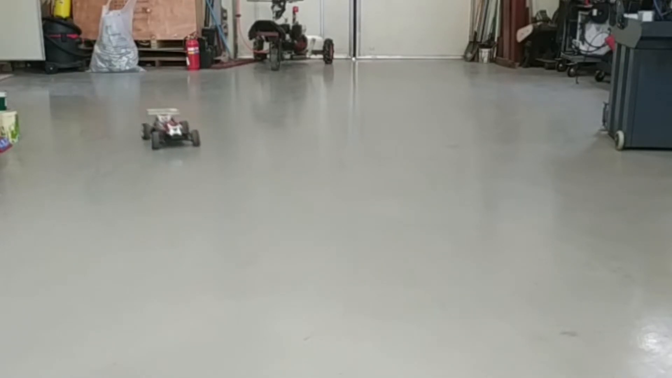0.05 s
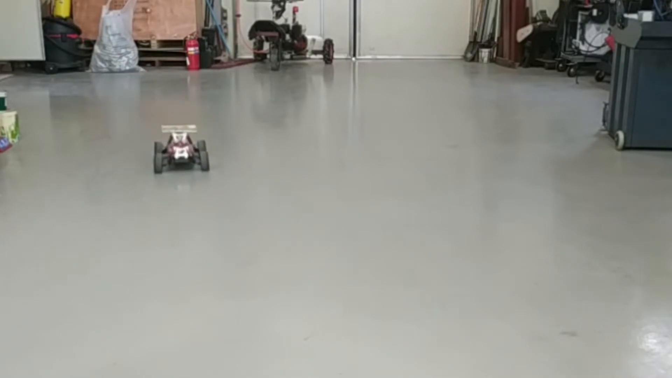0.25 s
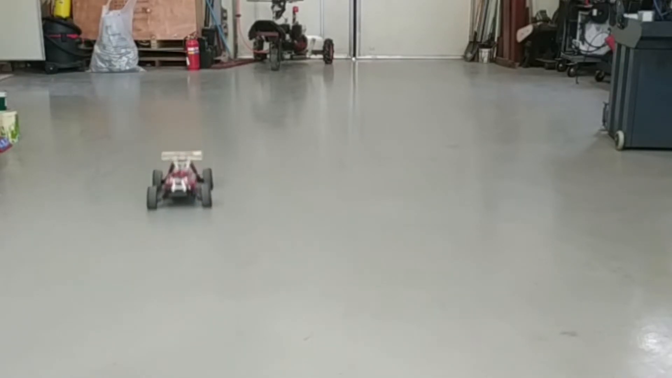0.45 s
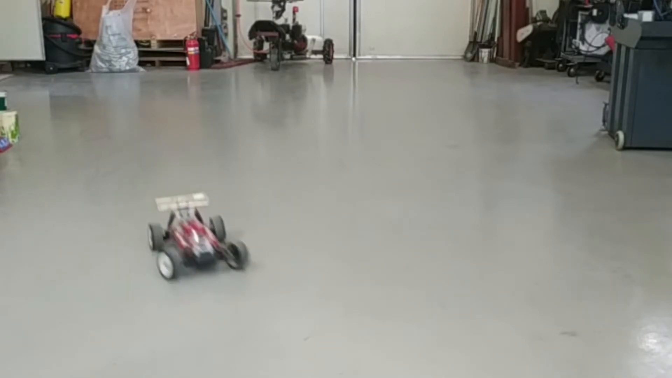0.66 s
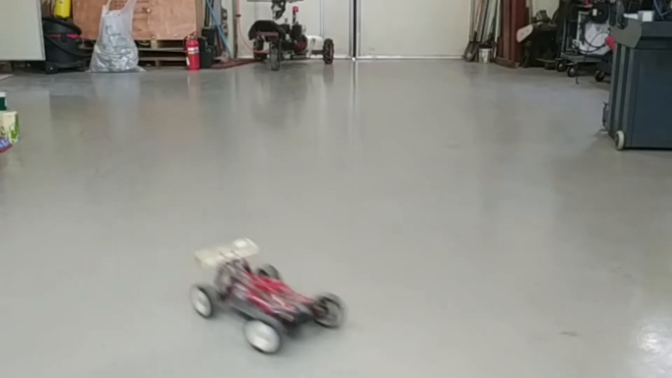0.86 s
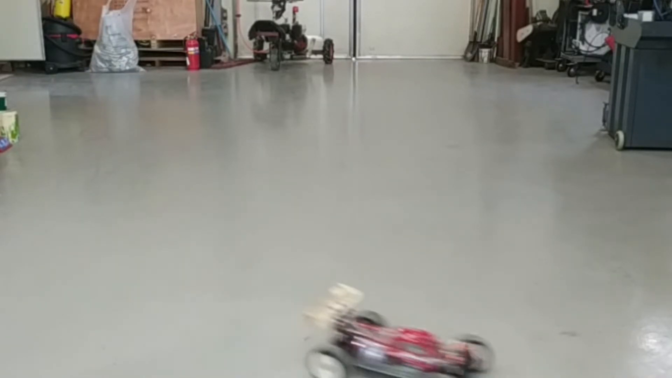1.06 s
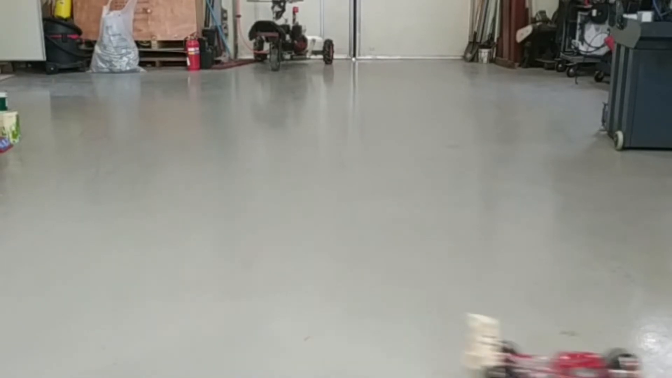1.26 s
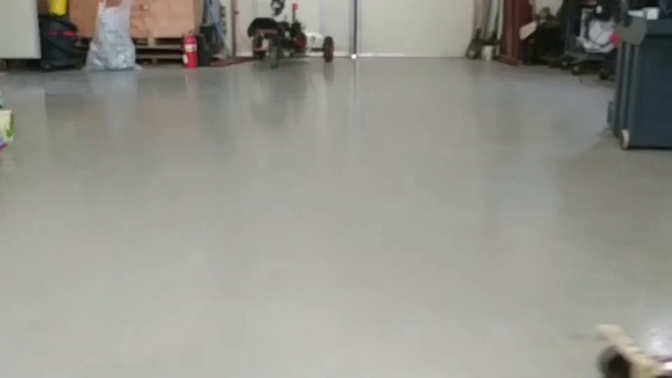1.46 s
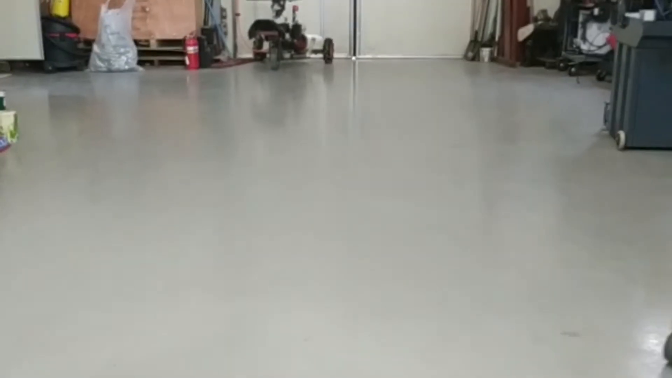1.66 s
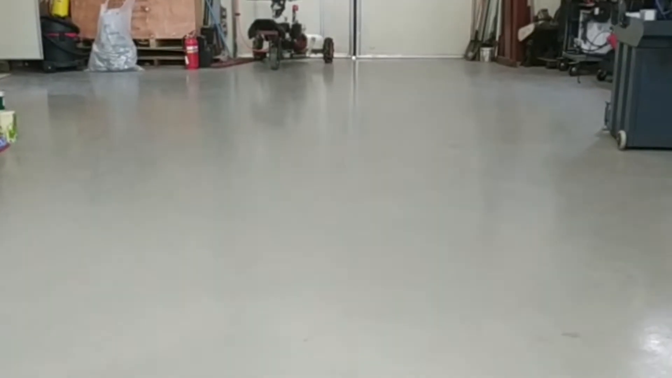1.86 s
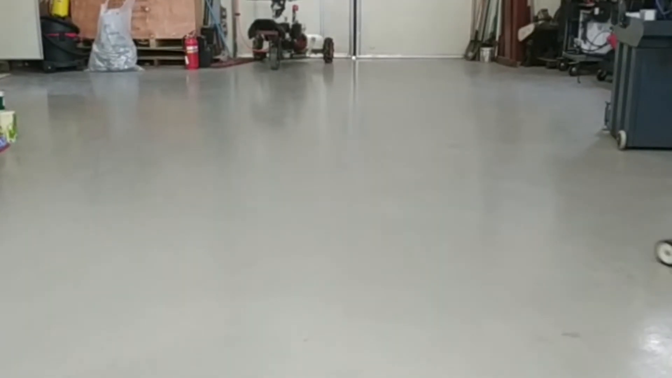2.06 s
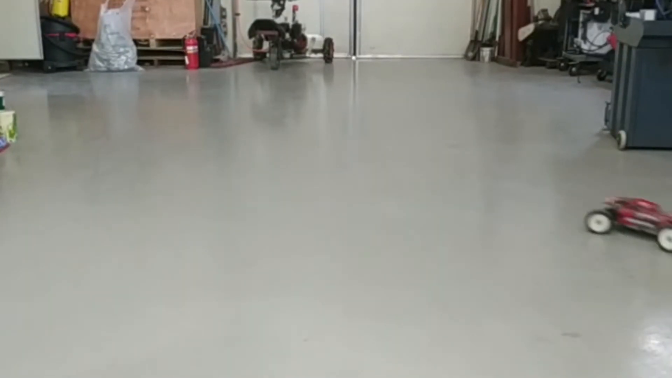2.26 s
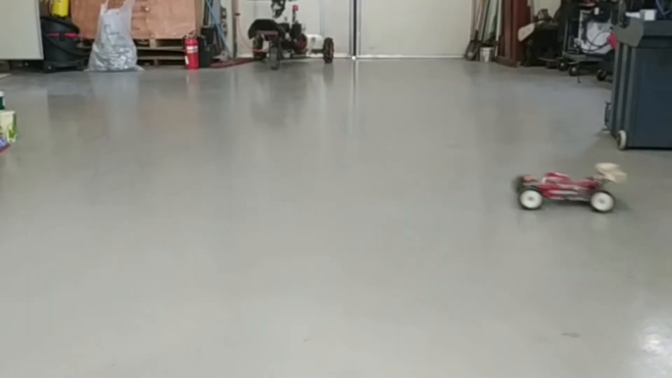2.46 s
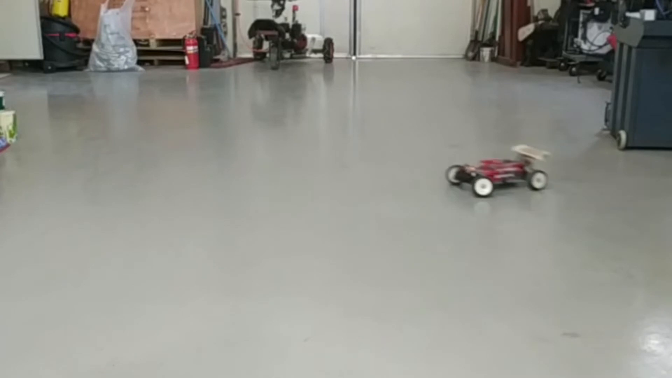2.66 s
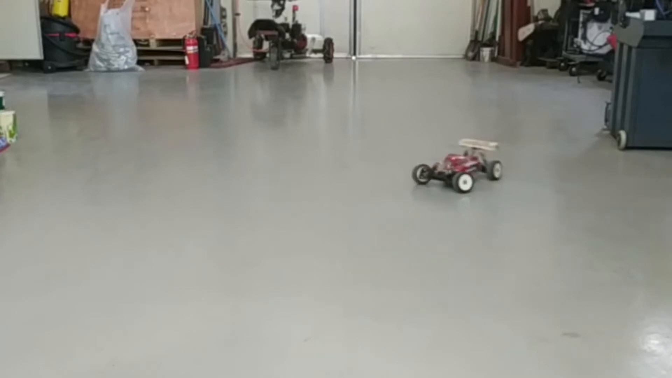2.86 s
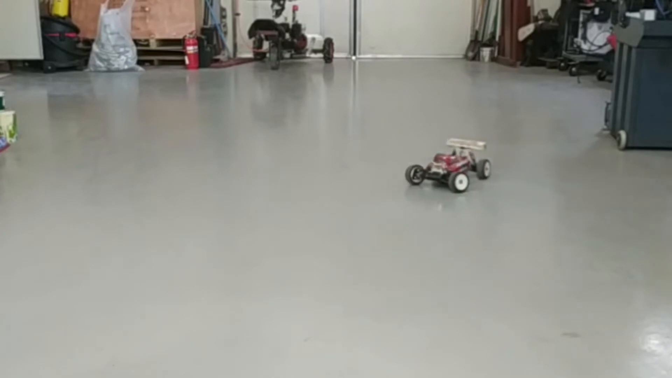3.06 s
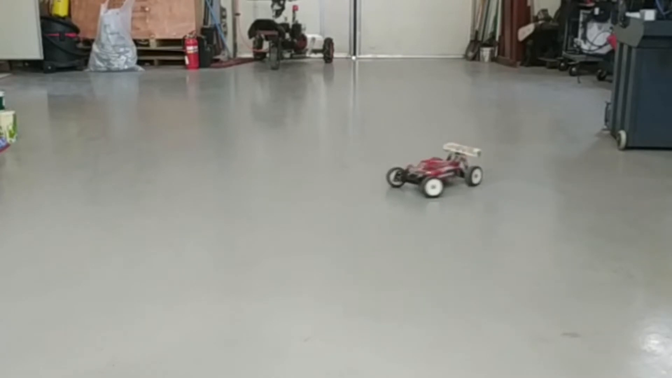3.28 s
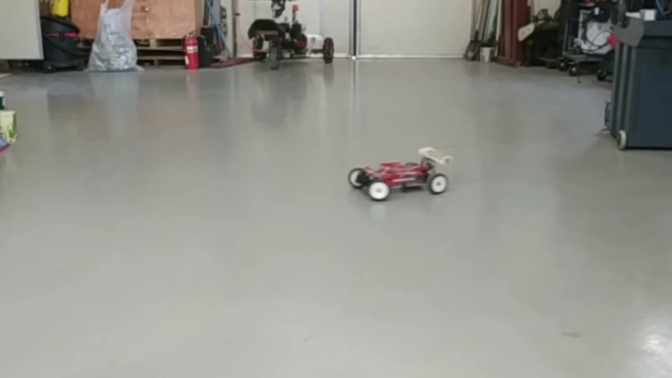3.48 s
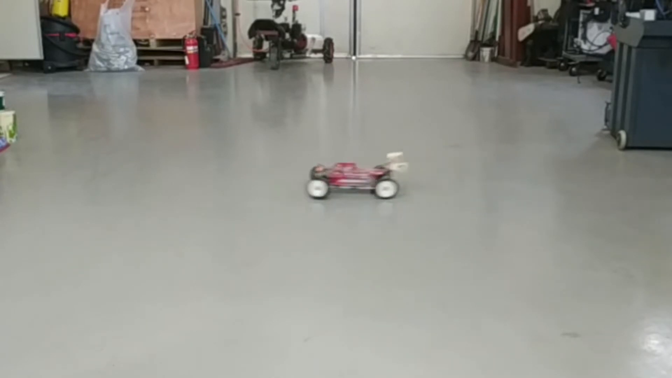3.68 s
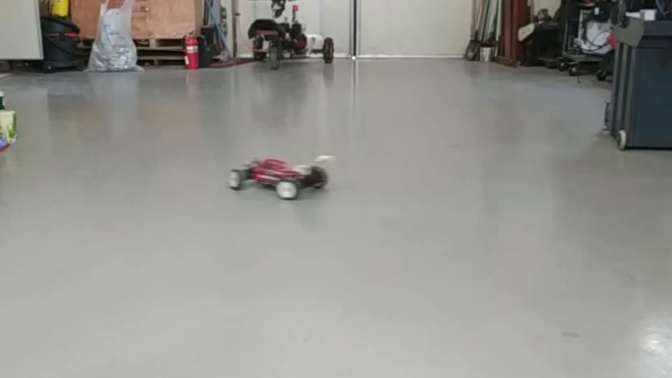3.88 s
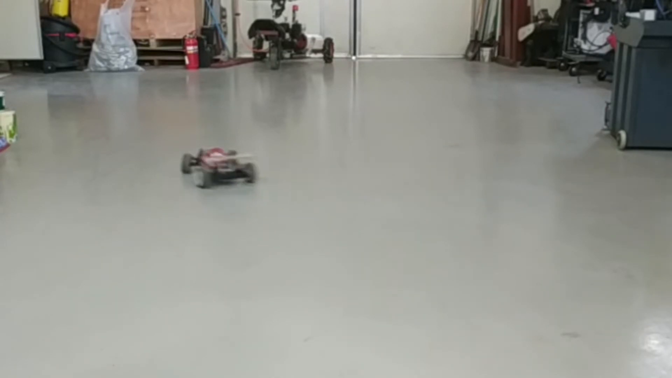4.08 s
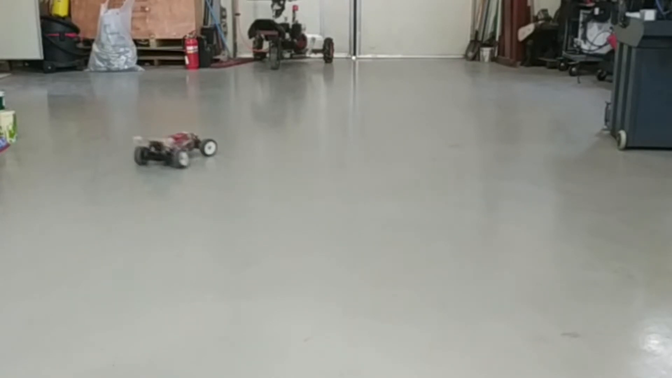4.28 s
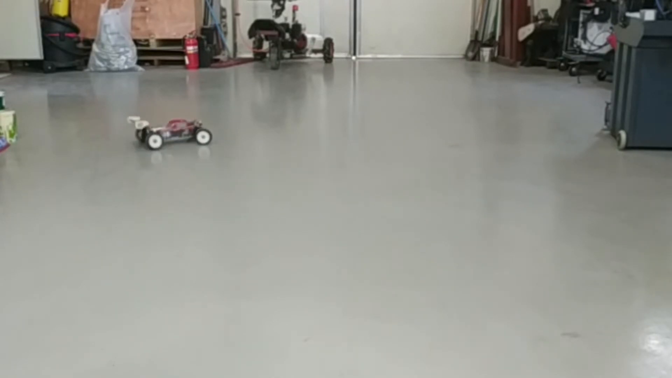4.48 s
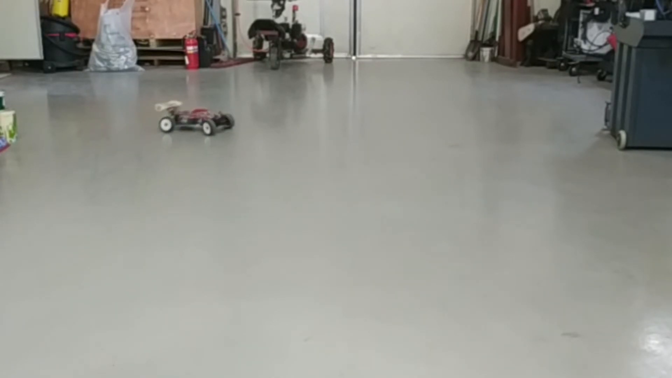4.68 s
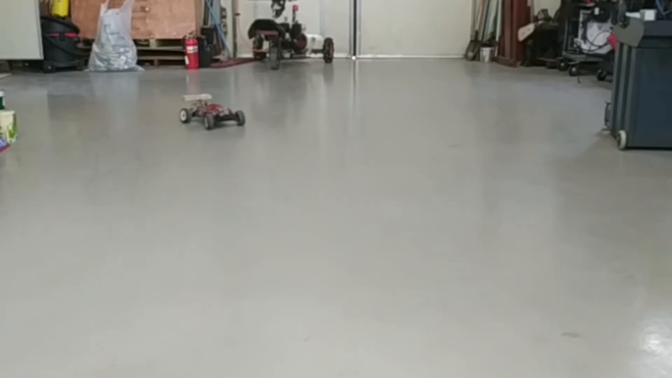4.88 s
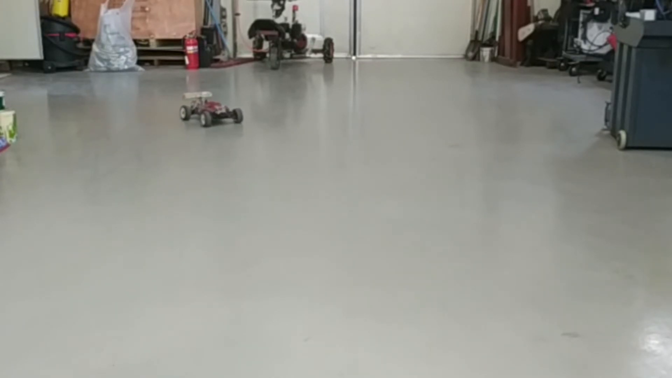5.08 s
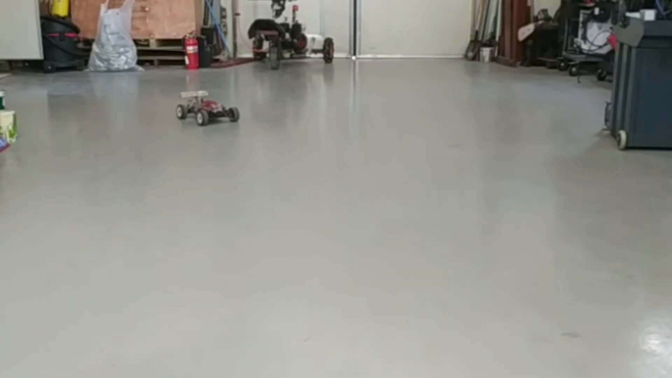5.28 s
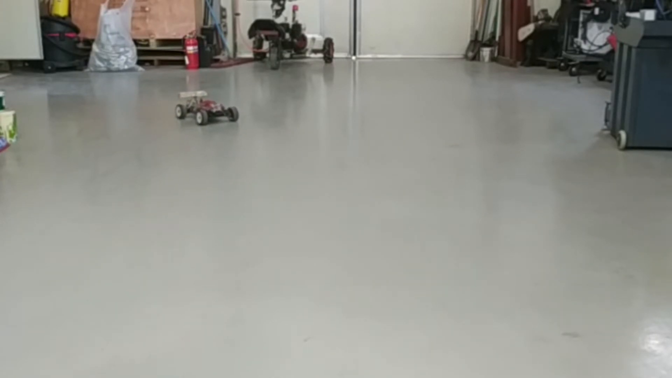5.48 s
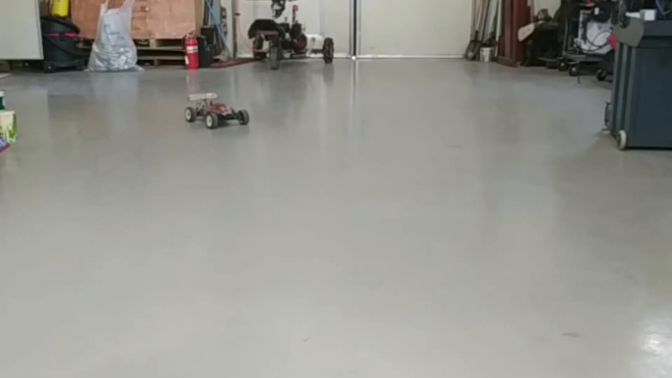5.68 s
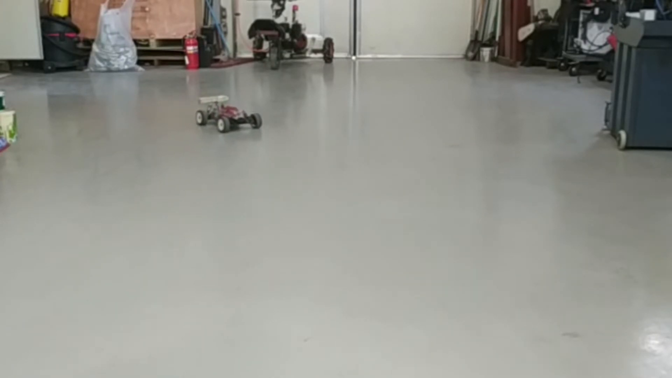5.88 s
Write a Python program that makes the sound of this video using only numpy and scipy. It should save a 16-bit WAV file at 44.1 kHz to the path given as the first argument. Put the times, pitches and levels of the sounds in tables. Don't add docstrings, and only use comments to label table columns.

```python
import sys
import numpy as np
from scipy import signal
from scipy.fft import rfft, irfft, next_fast_len
from scipy.io import wavfile
from scipy.ndimage import uniform_filter1d

SR = 44100
rng = np.random.default_rng(int(sys.argv[2]) if len(sys.argv) > 2 else 0)


def magnitude_from_level(level_db):
    exponent = np.asarray(level_db, float) / 20
    return 10 ** exponent


def transcribe(signal):
    frames = np.atleast_2d(signal).T
    limited = np.clip(frames, -1, 1)
    pcm = np.round(limited * 32767).astype(np.int16)
    wavfile.write(sys.argv[1], SR, pcm)


N = 261821
TIME = np.arange(N) / SR
FAST = next_fast_len(N)

# (frequency [Hz], density [dB per Hz])
HALL_AIR = [(15, -65), (25, -42), (92, -22), (217, -1.5), (293, -7), (775, -14), (1290, -2), (1440, -32),
            (3340, -24), (3620, -49), (5880, -27), (12900, -22), (16000, -30)]
# (frequency [Hz], time to fall 60 dB [s])
ECHO_T60 = [(200, 0.64), (1500, 1.39), (5000, 0.69), (13000, 0.1)]
# (frequency [Hz], likeness [0-1])
LIKENESS = [(30, 0.1), (70, .8), (130, 1), (290, 0.81), (640, 0.51), (1410, 0.03), (3100, 0.05),
            (15000, 0.01)]
# (time [s], distance [m])
DISTANCE = [(0, 4.4), (.8, 2.46), (1.5, 1.44), (2.3, 2.3), (3.0, 1.93), (5.94, 4.6)]
# (time [s], level [dB])
ROLLING = [(0, -32.5), (.24, -38.5), (.6, -36), (.87, -37.5), (1.25, -41.5), (1.55, -44), (1.95, -49),
           (2.3, -34), (2.5, -38.5), (2.93, -57.5), (3.04, -95.5), (3.25, -36), (3.42, -46), (3.52, -43.5),
           (3.77, -36), (4.67, -36), (5.19, -68.5), (5.43, -66.5), (5.64, -39.5), (5.87, -73)]
# (start [s], rise [s], hold [s], level [dB], release [dB per s])
PULLS = [
    (0.237, 0.013, 0.093, -33.5, 72),
    (1.6, 0.03, 0.03, -38, 90),
    (1.622, 0.074, 0.083, -30.5, 94),
    (1.931, 0.032, 0.11, -32, 63),
    (3.047, 0.055, 0.063, -30.5, 91),
    (3.534, 0.032, 0.006, -27, 66),
    (3.893, 0.055, 0.072, -34, 38),
    (4.23, 0.076, 0.043, -32, 46.5),
    (5.44, 0.06, 0.066, -32.5, 86),
    (5.875, .035, 0.045, -37, 95.5),
]
JOLT = [.18, .18, .1, .18, 0.29, .3, .18, .18, 0.067, .1]
PULL_EDGE_DB = [-0.5, 4, 3, 1, -0.5, -1.5, 0.5, 0.5, 2, 2]
# (start [s], spin-up [s], tooth rate from [Hz], to [Hz], whine over the frame rattle [dB])
SPINS = [(-.01, .25, 2650, 2400, -2), (4.37, .02, 1800, 2500, -14), (5.26, .05, 451, 455, 26),
         (5.36, .08, 475, 548, 20), (.66, .2, 2600, 2450, -10), (.95, .65, 1400, 720, -10),
         (3.595, .06, 1290, 3750, -1), (4.0, .1, 1400, 4750, -6), (.225, .03, 1500, 1700, -12),
         (.257, .075, 1700, 2650, 5), (.345, .005, 2720, 2760, 4), (1.64, .04, 830, 760, 6),
         (1.725, .04, 800, 1050, 6), (1.96, .045, 1030, 1120, 11), (2.0, .055, 1080, 1560, 11),
         (2.04, .07, 1480, 3450, 7), (2.115, .04, 3500, 4600, -2), (3.045, .055, 600, 940, 7),
         (3.095, .04, 900, 1850, 8), (3.135, .018, 1840, 1860, 7), (3.153, .01, 2100, 2350, 0),
         (3.245, .045, 2200, 1200, -6), (3.31, .07, 1210, 1180, -1), (3.53, .045, 850, 1280, 8),
         (3.925, .03, 1000, 1290, 5), (4.15, .08, 1150, 1270, -2), (4.24, .12, 1580, 1750, -7),
         (5.445, .075, 550, 1100, 8), (5.512, .015, 1090, 1138, 11), (5.89, .03, 650, 810, 7)]
# (rolling [dB], slope, pull [dB], slope, pull tilt [dB per octave of motor speed])
LAYERS = [
    (-40.5, 0.9, -40.5, 0.6, 1),
    (-48, 0.63, -47.5, 0.55, -6),
    (-43.5, 1.44, -41.5, 0.58, 4),
    (-53.5, 0.75, -52, 1.4, 0.5),
    (-50, 0.79, -34.5, 0.96, 3.5),
]
NEAR_SHARE = [.01, 0.44, 0.6, 1.33, 2]
ROLL_TILT = [0.26, 0.86, -1.14, 0.46, 0.98]
EDGE_SHARE = [0.32, -0.34, 0.46, 0.01, 0.7]
# (frequency [Hz], density [dB per Hz])
TYRES = [(150, -19.5), (250, -9.5), (268, -13.5), (350, -7), (486, -3), (538, -3.5), (900, 3.5),
         (1170, -10), (1980, -120)]
# (frequency [Hz], density [dB per Hz])
BEARINGS = [(2940, 1), (5000, -6), (5860, 1.5), (7980, 3), (8610, 1), (10000, -3), (12200, -4), (12700, 1),
            (13200, 4), (14100, -29), (15100, -23), (15800, -26)]
# (frequency [Hz], density [dB per Hz])
THROTTLE = [(6650, -17), (11300, -2), (12300, 1.5), (13100, 5.5), (14000, 1), (15200, 0), (15900, -19)]
# (start [s], length [s], from [Hz], to [Hz], level [dB])
SHAFT = [
    (0, 0.32, 405, 368.2, -57.5),
    (0.451, 0.62, 455, 312, -55),
    (2.357, 0.131, 421.4, 355.6, -53.5),
    (5.767, 0.17, 325, 400, -60),
]
# (frequency [Hz], width [Hz], level [dB])
CHASSIS = [(850, 435, -5.5), (1257, 200, 3), (1624, 400, -2.5), (2420, 780, -1.5), (2860, 737, -2),
           (3450, 730, -5.5), (5060, 1560, -7.5)]
# (tooth rate [Hz], level [dB])
GEARBOX = [(450, -14), (620, -12), (760, -6), (930, -5), (1100, 0), (1800, 4), (2400, 3), (2900, 0),
           (3800, -6), (5000, -10)]
# (tooth rate [Hz], level [dB])
SECOND = [(450, -26), (600, 1), (780, -4), (900, -1), (1080, -11), (1270, -2), (1600, -11), (2200, -19),
          (3000, -19), (4000, -8)]
# (tooth rate [Hz], speed scatter [0-1])
LOOSE_SLACK = [(1500, .04), (2200, .13), (2700, .065), (3400, .13)]
# (start [s], end [s])
CREEP_S = (5.25, 5.88)
# (frequency [Hz], threshold against the neighbours [dB])
VALLEY = [(3000, -4.2), (5000, -2.9), (11000, -2.4), (13000, -3.2)]

LOADED_SLACK = .042


def on_log(hz, table):
    at, value = np.transpose(table)
    return np.interp(np.log(hz + 1e-9), np.log(at), value)


def curve(table):
    return np.interp(TIME, *np.transpose(table))


def fade(span, edge_s):
    return np.clip(np.minimum(TIME - span[0], span[-1] - TIME) / edge_s, 0, 1)


def unit(x):
    return x / np.sqrt(np.mean(x ** 2))


def colour(x, table):
    hz = np.fft.rfftfreq(FAST, 1 / SR)
    below = (table[0][0] * .8, table[0][1] - 40)
    above = (table[-1][0] * 1.1, table[-1][1] - 40)
    shape = magnitude_from_level(on_log(hz, [below] + list(table) + [above]))
    return unit(irfft(rfft(x, FAST) * shape, FAST)[:, :N])


def pair(size):
    like = np.clip(on_log(np.fft.rfftfreq(size, 1 / SR), LIKENESS), 0, 1)
    spread = np.sqrt([1 + like, 1 - like]) / np.sqrt(2)
    mid, side = rfft(rng.standard_normal((2, size))) * spread
    return irfft(np.array([mid + side, mid - side]), size)


def walk(rate):
    k = int(SR / rate)
    steps = np.repeat(rng.standard_normal(N // k + 1), k)
    return unit(uniform_filter1d(uniform_filter1d(steps, k), k)[:N])


def hall():
    fan_hz = 219.1 * (1 + 0.016 * walk(39.8))
    hum = np.sin(2 * np.pi * np.cumsum(fan_hz) / SR) * magnitude_from_level(-65.5 + 1.1 * walk(22.46))
    air = magnitude_from_level(-58.5 + 0.15 * walk(4.5)) * colour(pair(size=FAST), HALL_AIR)
    return air + np.sqrt(2) * hum


def echo(x):
    tail_db, swell_s = -10, 0.17
    hz, t, tail = signal.stft(pair(size=2 * SR), SR, nperseg=512)
    tail = tail * 1000. ** (-t / on_log(hz, ECHO_T60)[:, None]) * (1 - np.exp(-t / swell_s))
    energy = np.mean(np.sum(abs(tail) ** 2, 2), 0)
    tail = signal.istft(tail / np.sqrt(energy)[:, None], SR)[1]
    tail *= magnitude_from_level(tail_db) / np.sqrt(np.sum(tail ** 2) / 2)
    return signal.fftconvolve(x[None], tail, axes=1)[:, :N]


def nearby(x, bounce_db, lag_s, count=40):
    bounce_t60_s = .06
    out, t, hop = np.zeros((2, N + SR)), np.arange(SR // 12) / SR, N // count + 1
    for k in range(-1, count):
        lo, hi = max(k * hop, 0), min((k + 2) * hop, N)
        piece = x[:, lo:hi] * np.sin(np.pi * (np.arange(lo, hi) - k * hop) / (2 * hop))
        paths = pair(size=len(t)) * 1000. ** (-t / bounce_t60_s)
        paths *= magnitude_from_level(bounce_db) / np.sqrt(np.sum(paths ** 2) / 2)
        paths[[0, 1], (rng.random(2) * lag_s * SR).astype(int)] += 1
        paths /= np.sqrt(1 + magnitude_from_level(2 * bounce_db))
        heard = signal.fftconvolve(piece, paths[:3 - len(x)], axes=1)
        out[:, lo:lo + heard.shape[1]] += heard
    return out[:, :N]


def motor():
    sag_per_s = .04
    rows = np.array(sorted(SPINS))
    start, spin, low_hz, high_hz, db = rows[np.searchsorted(rows[:, 0], TIME) - 1].T
    u = np.clip((TIME - start) / spin, 0, 1)
    after = np.maximum(TIME - start - spin, 0)
    hz = low_hz + (high_hz - low_hz) * u * u * (3 - 2 * u)
    return hz * np.exp(-sag_per_s * after), TIME - start, after, db


def throttle_pulls():
    pull = 1e-5
    for (start, rise, hold, db, release), jolt in zip(PULLS, JOLT):
        bite = np.clip((TIME - start) / rise, 0, 1) ** 1.7
        attack = jolt * fade((start, 9), 0.0014) + (1 - jolt) * bite
        released = np.maximum(TIME - start - rise - hold, 0)
        pull = np.maximum(pull, attack * magnitude_from_level(db - release * released))
    return pull


def drive():
    last = np.searchsorted(np.transpose(PULLS)[0], TIME) - 1
    edge_db = uniform_filter1d(np.array(PULL_EDGE_DB, float)[last], size=SR // 100)
    hz, _, after, _ = motor()
    coast_oct_s = 0.4
    pace = uniform_filter1d(np.log2(hz / 2000) - coast_oct_s * after, size=SR // 40)
    roll_db = curve(ROLLING) + 40
    pull_db = 20 * np.log10(throttle_pulls()) + 36
    near_db = 20 * np.log10(3 / curve(DISTANCE))
    levels = []
    for layer, near, tilt, edge in zip(LAYERS, NEAR_SHARE, ROLL_TILT, EDGE_SHARE):
        base_roll, roll_slope, base_pull, pull_slope, pull_tilt = layer
        rolling = base_roll + roll_slope * roll_db + near * near_db + tilt * pace
        pulling = base_pull + pull_slope * pull_db + pull_tilt * pace + edge * edge_db
        levels.append(10 * np.log10(magnitude_from_level(2 * rolling) + magnitude_from_level(2 * pulling)))
    return levels


def phone_gain():
    from_db, slope, lag_s = -43, 1, 0.0055
    over = np.maximum(drive()[-1] - from_db, 0)
    keep = np.exp(-1 / (lag_s * SR))
    return magnitude_from_level(-slope * signal.lfilter([1 - keep], [1, -keep], over))


def hiss(table, grit_db, flicker_db):
    grains = pair(size=FAST)[:, :N] * magnitude_from_level(grit_db * walk(900))
    return colour(grains, table) * magnitude_from_level(flicker_db * walk(24.85))


def tyres(level_db, gain):
    return magnitude_from_level(level_db) * gain ** 0.7 * hiss(TYRES, grit_db=-0.7, flicker_db=1.0)


def bearings(level_db):
    return magnitude_from_level(level_db + 0.85) * hiss(BEARINGS, grit_db=1.5, flicker_db=1.5)


def throttle_hiss(level_db):
    return magnitude_from_level(level_db - 2.5) * hiss(THROTTLE, grit_db=3.5, flicker_db=0.0)


def shaft():
    start, length, from_hz, to_hz, db = np.transpose(SHAFT)
    hz = np.interp(TIME, np.ravel([start, start + length], "F"), np.ravel([from_hz, to_hz], "F"))
    gate = sum(magnitude_from_level(d) * fade((s, s + n), 0.069) for s, n, d in zip(start, length, db))
    phase = 2 * np.pi * np.cumsum(hz * (1 + .055 * walk(90))) / SR
    return gate * magnitude_from_level(0.72 * walk(29.7)) * np.sin(phase)


def slack():
    launch_slack, launch_below_hz, creep_slack = .045, 950, .014
    hz, _, after, _ = motor()
    loaded = np.where(hz < launch_below_hz, launch_slack, LOADED_SLACK)
    loose = np.where((after > 0) | (hz > 3000), on_log(hz, LOOSE_SLACK), loaded)
    creep = (TIME > CREEP_S[0]) & (TIME < CREEP_S[1]) & ((after > 0) | (hz < 550))
    return uniform_filter1d(np.where(creep, creep_slack, loose), size=SR // 30)


def teeth():
    return 2 * np.pi * np.cumsum(motor()[0] * (1 + slack() * walk(250))) / SR


def rattle(phase):
    tooth = (phase / (2 * np.pi)).astype(int)
    strength = magnitude_from_level(1.5 * rng.standard_normal(N))[tooth]
    knocks = strength * (1 + 0.38 * np.cos(phase)) * pair(size=FAST)[:, :N]
    hz = np.fft.rfftfreq(FAST, 1 / SR)
    modes = 0
    for k, (f, width, db) in enumerate(CHASSIS):
        modes = modes + (-1) ** k * magnitude_from_level(db) * 1j * hz * width / (f * f - hz * hz + 1j * hz * width)
    low_edge = (hz / 750) ** 4 / (1 + (hz / 750) ** 4)
    body = rfft(knocks, FAST) * modes * low_edge / (1 + (hz / 5300) ** 8)
    shell = 1 / (1 + (hz / 1800) ** 6)
    return [unit(irfft(body * part, FAST)[:, :N]) for part in (1 - shell, shell)]


def whine(phase, frame_db):
    fade_db_s, dip_db, attack_s = 15, 4, 0.025
    loose = slack()
    flutter_db = np.minimum(1.5 + 30 * loose, 4)
    hz, since, after, db = motor()
    db = db - fade_db_s * after * hz / 2100 - dip_db * np.exp(-since / attack_s) + frame_db

    def through(table):
        return magnitude_from_level(uniform_filter1d(db + on_log(hz, table), size=SR // 80) + flutter_db * walk(60))

    first = through(GEARBOX)
    second = through(SECOND) * np.minimum(loose / LOADED_SLACK, 1) ** .6
    multiples = np.sin(2 * phase) + 0.2 * np.sin(3 * phase) + 0.096 * np.sin(4 * phase)
    return np.sqrt(2) * (first * np.sin(phase) + second * multiples) * magnitude_from_level(-7.5)


def buggy(gain):
    phase = teeth()
    frame_db, shell_db, bearing_db, tyre_db, throttle_db = drive()
    frame, shell = rattle(phase)
    body = (magnitude_from_level(frame_db + 0.5) * frame + magnitude_from_level(shell_db - 1.0) * shell) * magnitude_from_level(1.1 * walk(12))
    noises = body + tyres(tyre_db, gain) + bearings(bearing_db) + throttle_hiss(throttle_db)
    return whine(phase, frame_db) + shaft(), noises


def scene():
    gain = phone_gain()
    tones, noises = (part / gain for part in buggy(gain))
    close = nearby(tones[None], bounce_db=-6, lag_s=1.6e-4, count=37)
    close = close + nearby(noises, bounce_db=-2, lag_s=4e-4, count=86)
    return close + echo(tones + noises[0]) + hall()


def starve(x, order=8):
    from_hz, share, hold_s, mute_db = 2900, .06, .07, -35
    hz, t, z = signal.stft(x, SR, nperseg=2048)
    bands = len(hz) // order + 1
    slot = ((t + rng.random((bands, 1))) / hold_s).astype(int)
    muted = np.take_along_axis(rng.random((bands, slot.max() + 1)) < share, slot, axis=1)
    power = uniform_filter1d(np.sum(abs(z) ** 2, 0), size=2, axis=1)
    around = uniform_filter1d(power, size=51, axis=0)
    weak = uniform_filter1d(power, size=5, axis=0) < magnitude_from_level(2 * on_log(hz, VALLEY))[:, None] * around
    muted = (np.repeat(muted, order, axis=0)[:len(hz)] | weak) & (hz > from_hz)[:, None]
    return signal.istft(z * np.where(muted, magnitude_from_level(mute_db), 1), SR)[1][:, :N]


def roll_off(x):
    return signal.sosfilt(signal.butter(12, 15920, fs=SR, output="sos"), x)


def record(dry):
    top_cut = signal.ellip(10, .2, 70, 15750, fs=SR, output="sos")
    mix = signal.sosfilt(top_cut, starve(dry * phone_gain()))
    return roll_off(mix)


dry = scene()
out = record(dry)
transcribe(out)
```